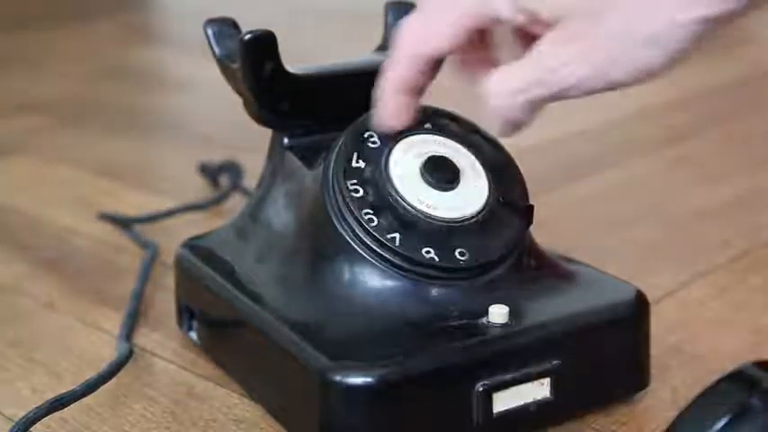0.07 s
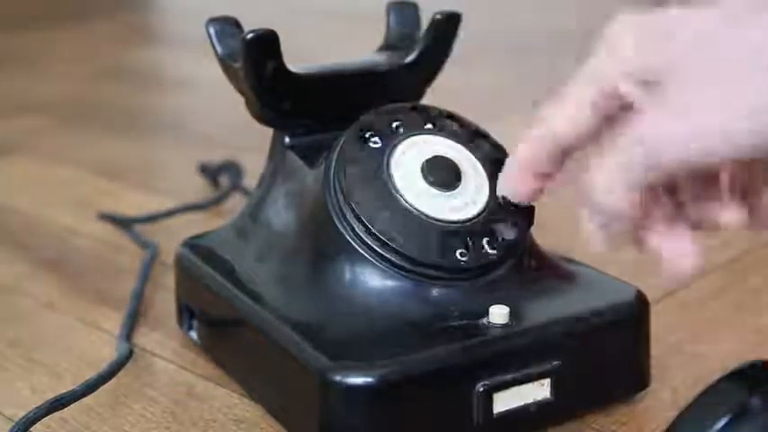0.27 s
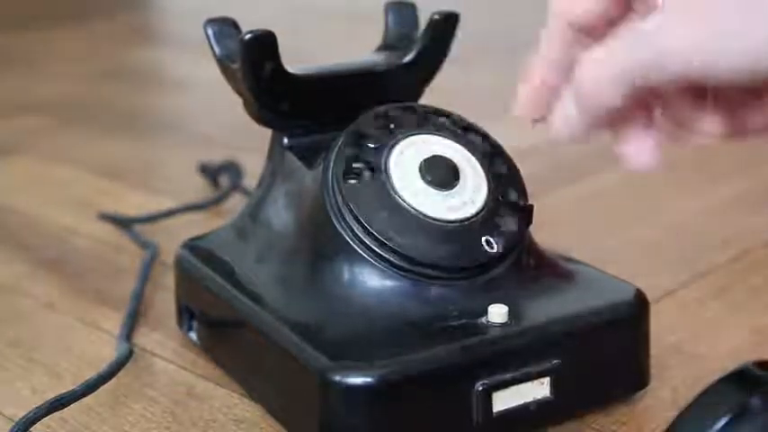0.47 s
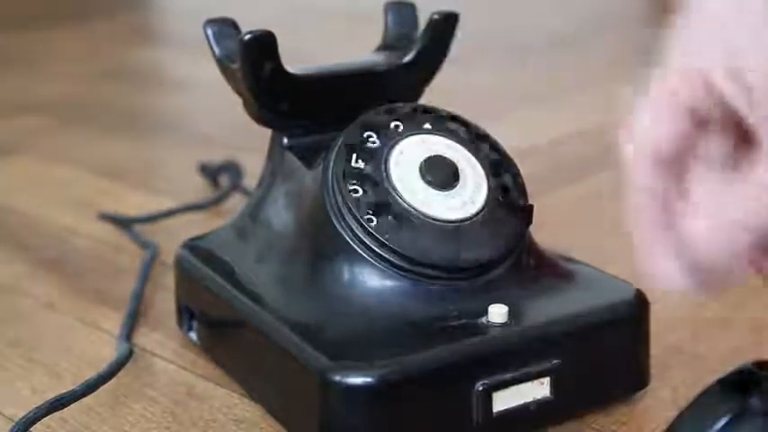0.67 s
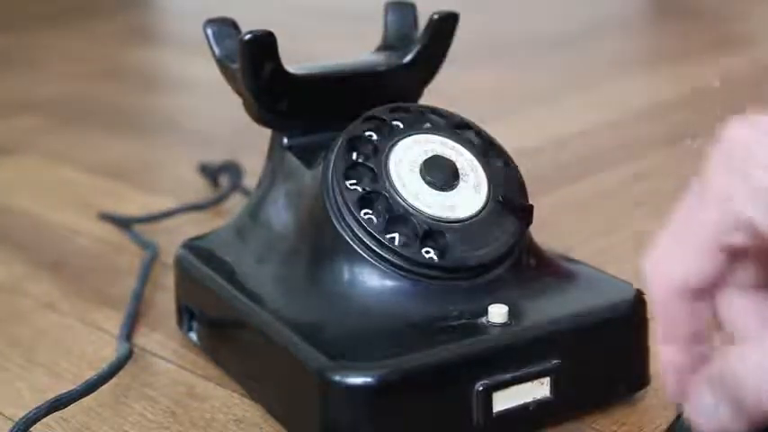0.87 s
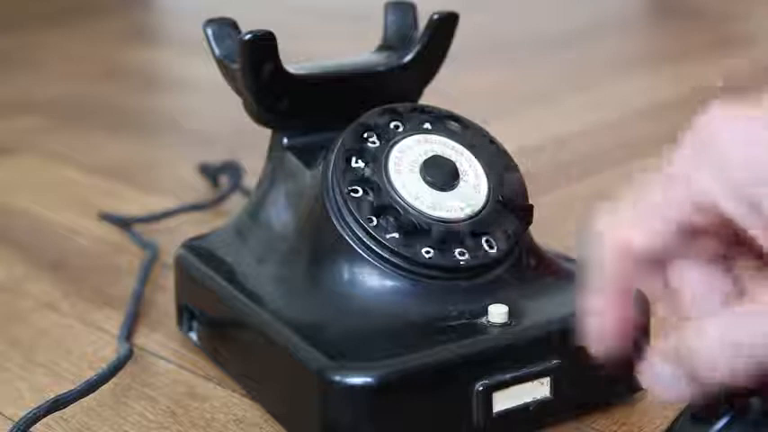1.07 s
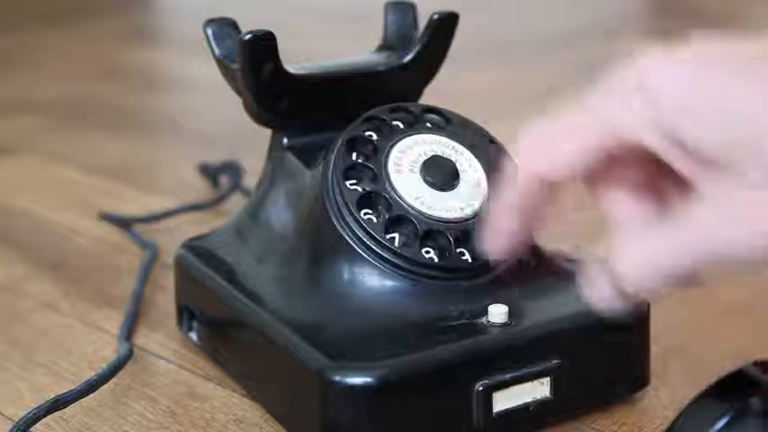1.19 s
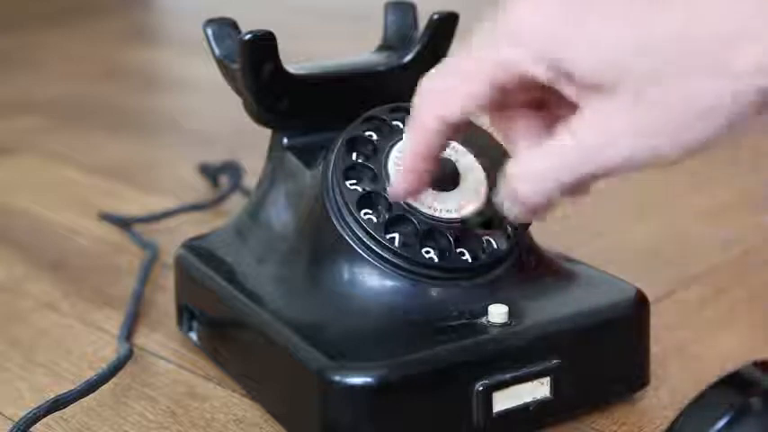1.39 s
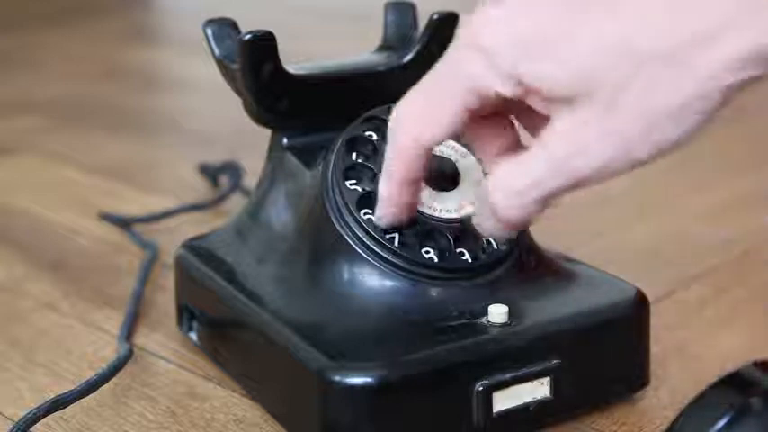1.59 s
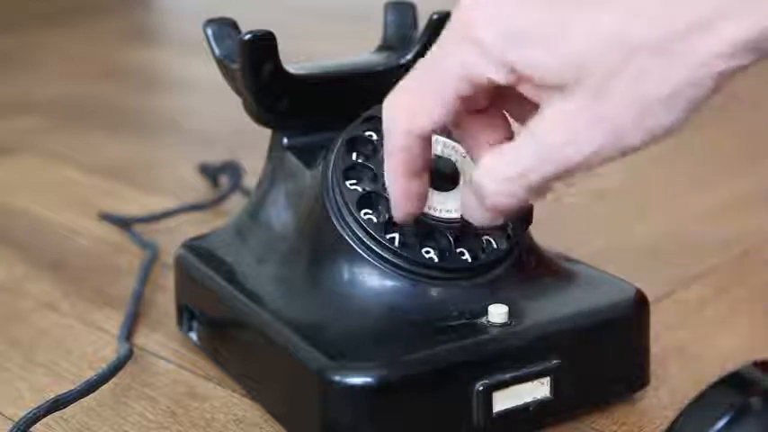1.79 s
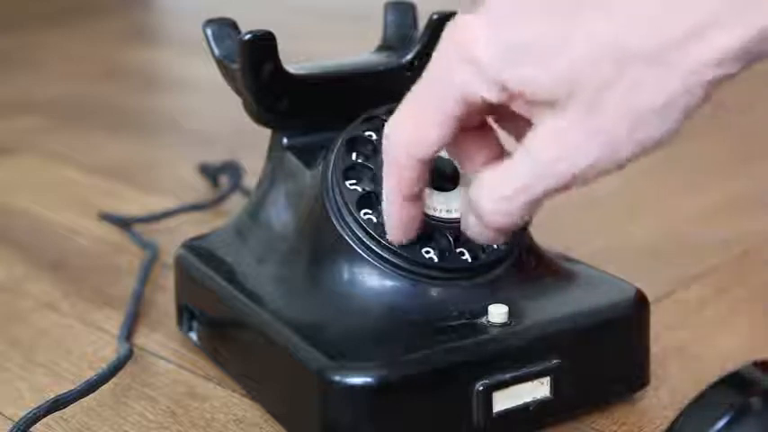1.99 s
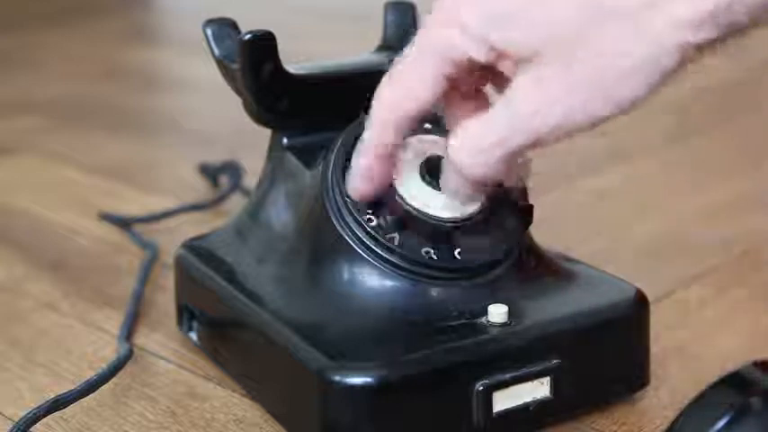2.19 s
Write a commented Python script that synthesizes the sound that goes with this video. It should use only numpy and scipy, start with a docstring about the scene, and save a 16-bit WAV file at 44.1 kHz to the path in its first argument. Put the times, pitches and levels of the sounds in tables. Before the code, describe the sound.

A rotary phone dial scrapes round, snaps free and whirs back, then is wound again.

```python
"""Dialling a rotary telephone

A telephone stands on a wooden floor in a quiet room. A finger winds the dial to its stop, scraping
and knocking, and lets go with a sharp clack. A spring runs the dial back against a whirring governor
(a small spinning brake) until it latches. Then the finger finds the next hole and winds again."""
import sys
import numpy as np
from scipy import signal
from scipy.fft import rfft, irfft
from scipy.io import wavfile

SR = 44100
rng = np.random.default_rng(int(sys.argv[2]) if len(sys.argv) > 2 else 0)


def bounce(signal):
    """Save signal as a 16-bit WAV file at the path given by the first command-line argument."""
    frames = np.transpose(np.atleast_2d(signal))
    limited = np.clip(frames, -1, 1)
    pcm = np.round(limited * 32767).astype(np.int16)
    wavfile.write(sys.argv[1], SR, pcm)


N = 99225
T = np.arange(N) / SR
RUN_START_S, LATCH_S = .385, 1.165  # the dial runs back between these times

# Ringing tones of the return spring: pitch_hz, level_db, ring_s
SPRING_TONES = [(2567, -43, 0.42), (2433, -46, .3), (5300, -53.5, 0.42)]


def dial_knocks():
    """Each knock clacks, ticks, and rings the hollow case, finger wheel, steel frame and spring."""
    # One knock a row: start_s, case_db, case_hz, wheel_db, wheel_hz (where the wheel rings best),
    # spread_octaves (around wheel_hz), clack_db, tick_db, decay_ms
    knocks = [(.014, -48, 420, -37, 1380, 0.13, -70, -57.5, 4),
              (0.0633, -59, 390, -64, 1410, 0.34, -52, -32.5, 0.67),
              (0.101, -50, 400, -42.5, 1110, 0.34, -52, -39, 4.1),
              (.109, -27, 386, -47, 1100, .5, -74, -63, 2),
              (0.1434, -37, 427, -56, 1100, .5, -70, -41, 1.2),
              (0.2292, -16.5, 407.3, -28, 1090, 0.49, -59, -47, 3),
              (0.2352, -22.5, 413, -51, 1700, 0.78, -40, -23, 2.17),
              (0.3375, -52, 416, -41, 1400, .5, -36, -39, 1.9),
              (0.3437, -59, 420, -61, 1410, .5, -32.5, -53, 1.2),
              (.352, -57, 415, -25.5, 1120, 0.12, -62.5, -73, 5.1),
              (0.3736, -10, 422.6, -13, 1490, 0.38, -16.5, -15.5, 2.66),
              (0.3779, -23.5, 419, -13.5, 1060, 0.24, -30, -21.5, 1.7),
              (0.87, -67, 400, -49, 1410, .5, -38, -38.5, 1.2),
              (1.046, -55, 395, -59, 1410, 0.45, -35, -38.5, 1.2),
              (1.133, -53, 397, -49, 1420, .3, -38, -44, 2.5),
              (1.154, -34, 385, -24.5, 1400, 0.088, -30, -20.5, 1.7),
              (1.157, -47, 370, -33, 1400, 0.2, -31.5, -40, 4.5),
              (1.168, -26.5, 391, -28, 1420, 0.17, -27.5, -25, 3.9),
              (1.1698, -63, 376, -35, 1410, 0.14, -27, -23.5, 1.9),
              (1.174, -46, 374, -43, 1424, 0.33, -34, -52, 1.9),
              (1.1817, -57, 397, -53, 1400, .5, -64, -32, 3.2),
              (1.654, -34, 420, -43, 1590, 0.69, -44, -43.5, 2.7),
              (1.731, -34.5, 391, -44, 1410, 0.93, -49.5, -44, 1.5),
              (1.737, -28.5, 409, -52, 1200, .5, -71, -62, 1.8),
              (1.771, -40, 493, -17, 1215, 0.1, -36, -44, 2.65),
              (1.955, -19, 415.4, -35.5, 1410, 0.75, -45.5, -49, 2.4),
              (1.976, -37, 410, -32.5, 1150, 0.29, -46, -65, 2),
              (2.0588, -65, 400, -59, 1590, 0.38, -44, -26.5, 1.65),
              (2.070, -66, 400, -22.5, 1350, 0.14, -27, -44, 1.34),
              (2.1669, -39, 427, -70, 1760, 0.43, -38.5, -47, 2.2),
              (2.242, -36, 406, -68, 1490, 0.45, -46, -36.5, 2)]
    # Ringing tones of each part: pitch_hz, level_db, ring_s
    case_tones = [(377, -41, .14), (407, -32.5, 0.16), (438, -27.5, 0.15)]
    wheel_tones = [(845, -16.5, 0.043), (1050, 1.5, 0.011), (1088.6, -5.5, 0.059), (1228, -8, 0.022),
                   (1315, -7, 0.023), (1467, -4.5, 0.032), (1712, -5.5, 0.021), (1798, -11.5, 0.066),
                   (1922, -9, 0.038)]
    frame_tones = [(2419, -14, 0.0477), (2980, -12, 0.028), (3353, -11, 0.036), (3800, -9, 0.028),
                   (4930, -14, 0.03), (5150, -8, 0.0155)]
    # Tone colours of the clack, the metal tick and the hollow case: pitch_hz, level_db
    clack_colour = [(100, -70), (300, -29.5), (800, -4.5), (1300, -9), (2050, -3.5), (2600, 0), (3500, -3),
                    (5000, -4), (7000, -4.5), (16000, -38.5)]
    tick_colour = [(1500, -47), (4000, -18), (5200, -11), (6300, -6.5), (6900, -9.5), (8400, -2.5),
                   (9200, -10.5), (10200, -17), (11200, -24), (12500, -33), (16000, -37)]
    case_colour = [(100, -11), (340, -1), (480, -0.5), (560, -8), (900, -12)]
    out, hollow = np.zeros(N), np.zeros(N)
    case = ring(case_tones)
    steel = ring(frame_tones) + ring(SPRING_TONES)
    for start_s, case_db, case_hz, wheel_db, wheel_hz, spread, clack_db, tick_db, decay_ms in knocks:
        thump = ring([(case_hz, 0, .038)])
        add(hollow, start_s, undb(case_db) * (case + thump))
        # Where the knock lands decides which of the wheel's tones ring most.
        struck_tones = [(hz, db - 3 * min((np.log2(hz / wheel_hz) / spread) ** 2, 5), ring_s)
                        for hz, db, ring_s in wheel_tones]
        add(out, start_s, undb(wheel_db) * ring(struck_tones, size=6000))
        add(out, start_s, undb(clack_db) * steel)
        add(out, start_s, undb(clack_db) * contact(clack_colour, decay_ms))
        add(out, start_s, undb(tick_db) * contact(tick_colour, decay_ms))
    return out + colour(hollow, case_colour)


def release_crack(start_s=.3737):
    """The mechanism snaps as the finger lets go, and its steel rings for a few milliseconds."""
    # Tone colour of the crack: pitch_hz, level_db
    crack_colour = [(1000, -27), (3000, -7), (5200, -7), (6200, -5), (8200, 3), (10200, -11.5), (11200, -8),
                    (12500, -10), (16000, -22)]
    # Ringing tones of the steel: pitch_hz, level_db, ring_s
    steel_tones = [(6820, -12, 0.013), (7280, -3.5, 0.0076), (8100, -6, 0.0078)]
    out = np.zeros(N)
    add(out, start_s, undb(-3.5) * contact(crack_colour, decay_ms=.48))
    add(out, start_s, ring(steel_tones))
    return out


def run_back():
    """As the dial runs back, gear teeth rattle the works and the governor rubs inside its cup."""
    # Pitches at which the works ring: pitch_hz, width_hz, level_db
    resonances = [(421, 56, 2), (1076, 60, -2.5), (1415, 199, 0.5), (1670, 440, -4.5), (2524, 390, -1),
                  (2807, 240, 0), (3320, 143, 0), (3967, 170, -2.5), (4750, 540, -6.5), (5880, 760, -9.5),
                  (7500, 1100, -12)]
    # Tone colours of the gears and the rubbing: pitch_hz, level_db
    gear_colour = [(150, -33), (380, 0.5), (580, -16.5), (740, 3), (900, -10), (1100, 0.5), (8200, -4.5),
                   (9200, -4.5), (12000, -14), (16000, -22)]
    rub_colour = [(1500, -7.5), (4000, -5), (6200, 1.5), (7300, -1), (7900, 6), (8300, 0), (8800, -10.5),
                  (11200, -14), (13000, -28), (16000, -35)]
    governor_hz, slowing_hz_per_s, fade_in_s = 48.2, 2.6, .077
    elapsed_s = T - RUN_START_S
    running = np.clip(elapsed_s / fade_in_s, 0, 1) * (T < LATCH_S)
    # The governor slows slightly as the spring unwinds.
    turns = (governor_hz - slowing_hz_per_s * elapsed_s / 2) * elapsed_s
    # It rubs hardest twice a turn; one of the two rubs varies in force from turn to turn.
    force = undb(3.5 * rng.standard_normal(N))[np.floor(turns).astype(int)]
    main_rub, second_rub = (np.exp(-.5 * ((phase % 1 - .5) / .035) ** 2) for phase in (turns, turns + .4))
    pressure = unit(force * main_rub + .7 * second_rub + .25)
    teeth = sum(np.sin(2 * np.pi * teeth_per_turn * turns) for teeth_per_turn in (5, 7))
    rattle = grit(spread_db=.5) * (1 + .16 * teeth) * (1 + .05 * pressure)
    works = sum((-1) ** k * undb(db) * signal.lfilter(*signal.iirpeak(hz, hz / width, fs=SR), rattle)
                for k, (hz, width, db) in enumerate(resonances))
    # The gears grow louder while the rubbing fades.
    gears = undb(-44.5 + 4.5 * elapsed_s) * unit(colour(works, gear_colour))
    rubbing = undb(-49 - 7 * elapsed_s) * unit(colour(grit(spread_db=.5) * pressure, rub_colour))
    return running * (gears + rubbing)


def case_thuds(ring_s=.11):
    """The telephone rocks on its feet under the finger: dull thuds with one overtone each."""
    # One thud a row: start_s, level_db, pitch_hz
    thuds = [(0.113, -29.5, 100.4), (0.122, -35.5, 95), (.234, -38, 99), (0.255, -33, 96.6),
             (0.407, -30, 112.4), (0.489, -38, 99), (1.703, -41, 101.6), (1.829, -52, 106),
             (1.956, -29, 115.5), (1.971, -34, 97.6)]
    out = np.zeros(N)
    for start_s, db, hz in thuds:
        add(out, start_s, ring([(hz, db, ring_s), (hz * 1.6, db - 3, ring_s)]))
    return out


def winding():
    """The finger scrapes the dial round; the hand rumbles through the case."""
    # Loudness of the three scraping strokes and of the hand's rumble: time_s, level_db
    strokes = [
        [(0, -50.5), (.05, -54), (.08, -55.5), (.165, -55.5), (.195, -45.5), (.23, -40), (.245, -55.5),
         (.33, -65), (.37, -90)],
        [(1.63, -64), (1.655, -52.5), (1.68, -84.5), (1.79, -63), (1.85, -59), (1.91, -70), (1.945, -53.5),
         (1.97, -64)],
        [(2.06, -46), (2.08, -52), (2.13, -52.5), (2.165, -44), (2.195, -57), (2.25, -66)],
    ]
    rumble_levels = [(0, -64), (.085, -71), (.11, -52.5), (.25, -43.5), (.33, -60), (.65, -60.5),
                     (1.15, -62.5), (1.6, -64), (1.72, -50.5), (1.86, -48), (1.92, -55.5), (2.02, -45.5),
                     (2.25, -56.5)]
    # Tone colours of the scrape and the rumble: pitch_hz, level_db
    scrape_colour = [(200, -17), (420, -11), (650, -19.5), (1100, 0.5), (1400, 0), (2100, -3.5),
                     (3000, -2.5), (5500, -4.5), (8200, -4), (10000, -13.5), (16000, -40)]
    rumble_colour = [(25, -29.5), (50, -3.5), (90, 2.5), (170, -3.5), (300, -16), (400, -3.5), (550, -16.5),
                     (1500, -38.5)]
    scrape = unit(colour(grit(spread_db=5.5), scrape_colour)) * sum(map(curve, strokes))
    rumble = unit(colour(rng.standard_normal(N), rumble_colour)) * curve(rumble_levels)
    return scrape + rumble


def singing_spring():
    """The running works shake the return spring; it rings on after the dial latches."""
    shaking = rng.standard_normal(N) * (T > RUN_START_S) * (T < LATCH_S)
    return undb(-63.5) * unit(convolve(shaking, ring(SPRING_TONES)))


def room(x):
    """Add quick echoes off the floor and case, then the room's fading tail."""
    # Tone colour of the tail: pitch_hz, level_db
    tail_colour = [(60, 1.5), (200, -3), (400, 3.5), (800, 3.5), (1400, 0.5), (2500, 4.5), (4000, -2),
                   (8000, -3), (11000, -4.5), (16000, -6)]
    noise = colour(rng.standard_normal(N), tail_colour)
    low = signal.sosfilt(signal.butter(2, 4000, fs=SR, output="sos"), noise)
    treble = noise - low
    onset = np.clip(T / .014 - .5, 0, 1)  # the tail starts after 7 ms
    tail = (low * fade(ring_s=.56) + treble * fade(ring_s=.6)) * onset
    early = rng.standard_normal(N) * np.exp(-T / .0031) * (T > .001)
    echoes = (undb(-9.5) * unit(tail) + undb(-11) * unit(early)) / np.sqrt(N)
    return x + convolve(x, echoes)


def room_air():
    """The faint, steady hush of the room's air."""
    # Tone colour of the hush: pitch_hz, level_db
    air_colour = [(20, -34), (40, -11.5), (75, -5), (130, -22), (205, -0.5), (265, -8), (320, -23),
                  (575, -22), (1130, -22), (1370, -19.5), (2400, -25.5), (7000, -29), (14400, -36.5),
                  (16000, -44.5)]
    return undb(-56) * unit(colour(rng.standard_normal(N), air_colour))


def contact(points, decay_ms, rise_ms=.25, size=2048):
    """Two parts meet in a burst of tiny impacts that swells and dies within milliseconds."""
    ms = np.arange(size) / SR * 1000
    envelope = np.exp(-ms / decay_ms) * (1 - np.exp(-(ms / rise_ms) ** 2))
    burst = colour(rng.choice([-1., 1.], size) * envelope, points)
    return burst * np.sqrt(np.sum(envelope ** 2) / np.sum(burst ** 2))


def ring(tones, size=30000):
    """A struck part: each tone builds up in about one cycle and falls 60 dB in ring_s."""
    t = T[:size]
    out = np.zeros(size)
    for k, (hz, db, ring_s) in enumerate(tones):
        envelope = undb(db - 60 * t / ring_s) * (1 - np.exp(-hz * t / .92))
        out += (-1) ** k * envelope * np.sin(2 * np.pi * hz * t)  # neighbours swing opposite ways
    return out


def grit(spread_db):
    """Friction: dense tiny clicks of uneven size."""
    return unit(rng.standard_normal(N) * undb(spread_db * rng.standard_normal(N)))


def colour(x, points, size=8192):
    """Make some pitches in x louder and others softer, along (pitch_hz, level_db) points."""
    hz, db = np.array(points).T
    log_hz = np.log(np.fft.rfftfreq(size, 1 / SR) + 1)
    gains = undb(np.interp(log_hz, np.log(hz), db))
    # Fold the filter forward in time, so nothing sounds before its cause.
    cepstrum = irfft(np.log(gains))
    cepstrum[1:size // 2] *= 2
    cepstrum[size // 2 + 1:] = 0
    return convolve(x, irfft(np.exp(rfft(cepstrum))))


def curve(points):
    """Gain along (time_s, level_db) points, silent outside them."""
    times, db = np.array(points).T
    return undb(np.interp(T, times, db)) * (T >= times[0]) * (T <= times[-1])


def fade(ring_s):
    """A gain that falls 60 dB in ring_s seconds."""
    return np.exp(-np.log(1000) * T / ring_s)


def add(out, start_s, x):
    """Mix x into out from start_s on."""
    i = int(start_s * SR)
    out[i:i + len(x)] += x[:N - i]


def convolve(x, response):
    """Pass x through something that answers a single click with this response."""
    return signal.fftconvolve(x, response)[:N]


def undb(db):
    """Turn decibels into a gain."""
    return 10 ** (np.asarray(db) / 20)


def unit(x):
    """Scale x to an average (rms) level of 1."""
    return x / np.sqrt(np.mean(x ** 2))


def scene():
    """The telephone in the quiet room, as one channel."""
    air = room_air()
    phone = dial_knocks() + release_crack() + case_thuds() + run_back() + singing_spring() + winding()
    return (room(phone) + air)[None]


def record(dry):
    """Cut the treble above 16000 Hz."""
    return signal.sosfilt(signal.ellip(10, .2, 80, 16000, fs=SR, output="sos"), dry)


dry = scene()
out = record(dry)
bounce(out)
```